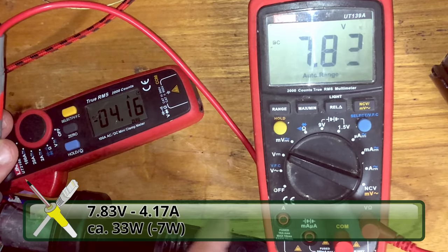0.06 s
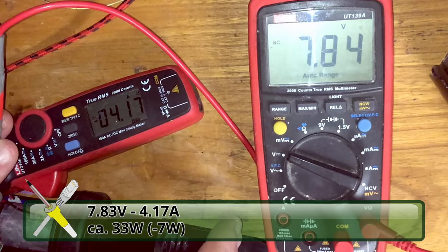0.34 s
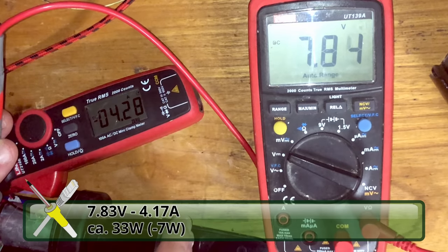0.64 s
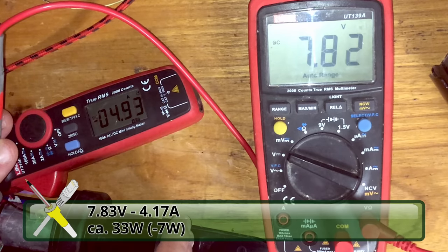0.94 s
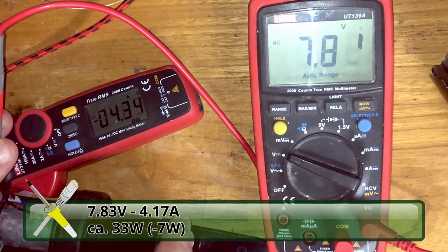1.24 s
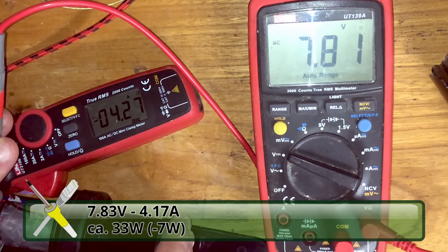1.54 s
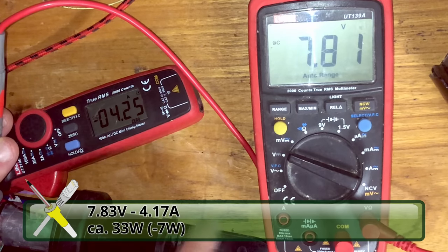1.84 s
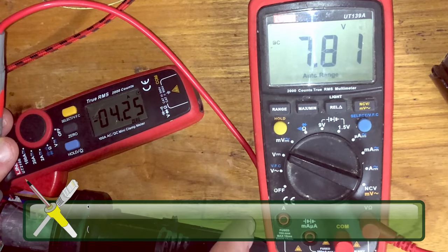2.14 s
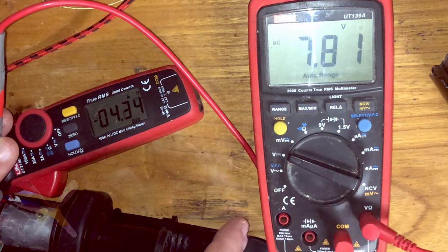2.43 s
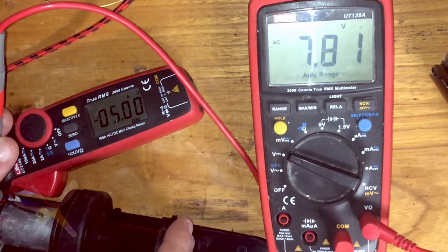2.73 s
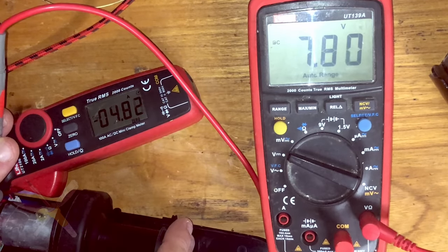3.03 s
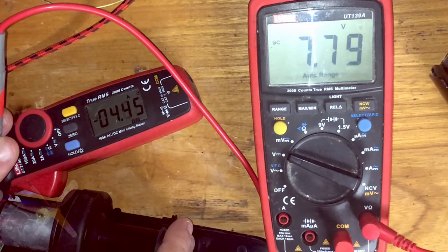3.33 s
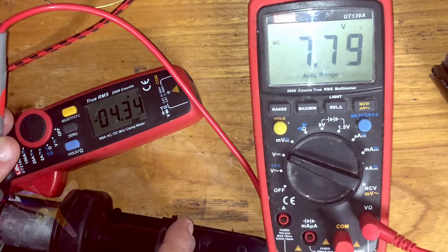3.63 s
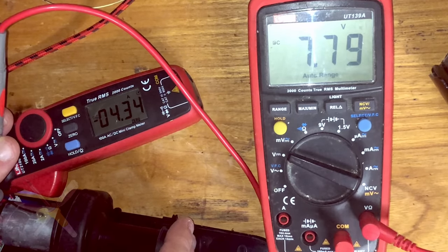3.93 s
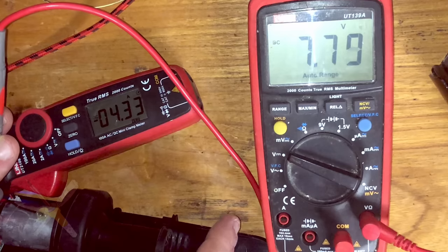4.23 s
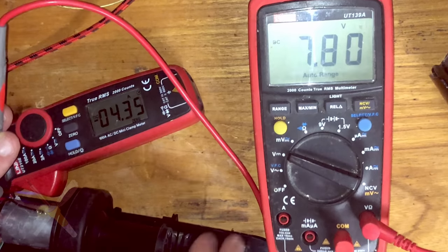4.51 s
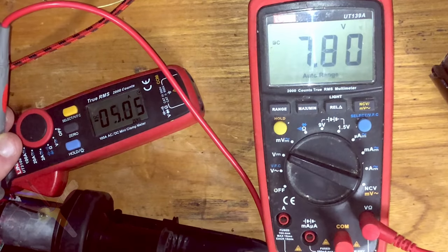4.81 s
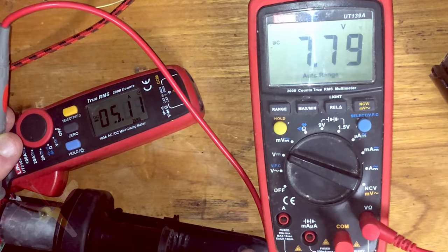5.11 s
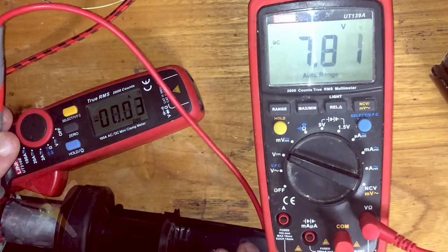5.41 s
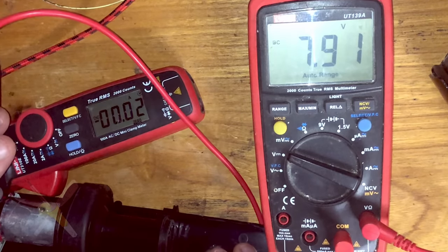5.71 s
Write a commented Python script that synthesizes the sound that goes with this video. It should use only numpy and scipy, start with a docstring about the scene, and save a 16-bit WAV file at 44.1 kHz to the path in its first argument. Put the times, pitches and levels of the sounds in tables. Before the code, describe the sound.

A small cordless vacuum whines over rushing air, rising in pitch twice as its nozzle is covered, then switches off and spins down.

```python
"""Handheld vacuum on a workbench

A cordless vacuum runs close by: its seven-blade fan whines over rushing air and a faint rumble.
Twice the nozzle is covered. With less air to move, the fan speeds up and burbles, and each release
lets in a gulp of air. Then the power is cut and the rotor coasts down with a dry rattle."""
import sys
import numpy as np
from scipy import signal
from scipy.fft import rfft, irfft
from scipy.io import wavfile

SR = 44100
rng = np.random.default_rng(int(sys.argv[2]) if len(sys.argv) > 2 else 0)


def inscribe(sig):
    """Save sig as 16-bit PCM at rate SR to the path in sys.argv[1].

    A 1-D sig is mono; a 2-D sig holds one channel per row.
    Samples are clipped to [-1, 1] before scaling.
    """
    pcm = np.round(np.clip(np.atleast_2d(sig).T, -1, 1) * 32767)
    wavfile.write(sys.argv[1], SR, pcm.astype(np.int16))


N = 254016

POWER_OFF_S, BLADES = 4.92, 7
START_HZ, OPEN_HZ, COVERED_HZ = 590, 541.8, 594.3  # shaft turns a second: at first, nozzle open, covered

# When the nozzle is covered: (start [s], end [s])
COVERINGS = [(0.573, 1.807), (2.622, 3.974)]
# The hum holds its first level, then sags shortly before the power is cut: (time [s], level change [dB])
HUM_SAG = [(4.41, 1.5), (4.47, -8.5), (4.6, 1.5), (4.65, -6.5)]
# Brief dips in the hum and the air: (start [s], end [s], level change [dB])
LULLS = [(0.574, 0.587, -12), (2.625, 2.64, -6), (4.175, 4.205, -1)]
# The blade whine with the nozzle open: (shaft speed [turns/s], level [dB])
WHINE_OPEN = [(220, -73), (462, -78), (478, -67), (505, -60), (542, -54.5), (548, -55), (554, -52),
              (575, -45), (590, -41.5)]
# The blade whine with the nozzle covered: (shaft speed [turns/s], level [dB])
WHINE_COVERED = [(545, -60.5), (563, -64), (574, -51), (578, -55.5), (586, -50), (591, -50)]
# Pitches where the whine gets quieter: (frequency [Hz], width [Hz], level change [dB])
WHINE_DIPS = [(3640, 110, -14), (3853, 14, -7), (3887, 12, -5), (3932, 22, -11)]
# The rotor's other tones; the two that are not whole come from ball bearings: (pitch [x shaft speed])
TONE_MULTIPLES = [2.131, 3.131, 5, 6, 8, 10, 14, 15, 20, 21, 25, 30, 35]
# Base level of each of those tones: (nozzle open [dB], covered [dB], coasting at 420 turns/s [dB])
TONE_LEVELS = [(-83, -83, -84), (-92, -79, -92), (-72.5, -71, -79), (-99, -86, -87), (-82, -79, -98),
               (-71, -68, -80), (-74, -78, -74), (-74, -71, -81), (-80, -84, -84), (-84, -74, -86),
               (-86.5, -88, -97), (-92, -92, -90), (-95, -95, -96)]
# Pitches at which the shell rings: (frequency [Hz], width [Hz], boost under power [dB])
SHELL_RESONANCES = [(1050, 150, 7), (1250, 70, 6), (1835, 120, 6), (2720, 400, 4), (4750, 300, 5),
                    (5520, 300, 7), (5920, 110, 6), (6500, 350, 5), (7900, 250, 8), (8250, 260, 10),
                    (8830, 190, 5), (12110, 470, 16), (13600, 700, 17), (14500, 450, 9), (15500, 500, 8)]
# Tone colour of the rushing air: (frequency [Hz], relative level [dB])
AIR_COLOUR = [(100, -52), (420, -29), (700, -18.5), (1300, -17), (2400, -16.5), (3500, -11), (4400, -2),
              (6400, -2.5), (7200, -5), (8450, -5.5), (8850, -12.5), (13200, -11), (14100, -19),
              (15700, -21.5)]
# Pitches at which the air ducts ring: (frequency [Hz], width [Hz], boost open [dB], boost covered [dB])
DUCT_RESONANCES = [(1003, 18, 9.5, -10), (1425, 150, 7, 12.5), (1904, 450, 8.5, 10), (2620, 330, 1, 6.5),
                   (2800, 82, -2.5, 1), (3400, 560, 1.5, 5.5), (4320, 54, 3, 6.5), (4650, 140, 0.5, 1.5),
                   (5020, 90, 4.5, 2.5), (5380, 210, 4.5, 1), (5680, 180, 3.5, 1), (6520, 230, 2, 4),
                   (7940, 710, 6.5, 2), (8760, 210, 5, -2), (9500, 340, 3.5, 1), (10550, 350, -1.5, -2.5),
                   (11200, 680, 2.5, 2), (12120, 990, 3.5, 3.5)]
# How the air's colour changes once the fan is slow: (frequency [Hz], level change [dB])
SLOW_AIR_CHANGE = [(300, 8), (1500, 9.5), (2800, 10.5), (3600, 5), (4500, 1), (6400, 1), (7650, 5),
                   (8050, 0), (9000, 3.5), (11000, -3), (12100, -7), (13200, 4), (14500, 5)]
# The gulp of air after each release, and smaller gusts: (start [s], end [s], boost [dB])
SURGES = [(0.0, 0.185, 2.5), (0.39, 0.455, 0), (1.8, 2.02, 3.5), (3.97, 4.168, 4), (4.965, 5.002, 2),
          (5.16, 5.26, 1)]
# Swells of the rumble: (start [s], end [s], deep part [dB], upper part [dB])
RUMBLE_SWELLS = [(0.13, 0.527, -86.5, -83.5), (1.518, 1.795, -103, -82), (2.6, 3.052, -87, -86.5),
                 (4.028, 4.334, -99, -87.5), (5.118, 5.148, -77, -77.5), (5.488, 5.76, -95, -76.5)]
# Tone colour of the rumble's deep part: (frequency [Hz], relative level [dB])
DEEP_RUMBLE_COLOUR = [(20, -22), (45, -17), (80, -1), (110, 4), (150, -1), (300, -34)]
# Tone colour of the rumble's upper part: (frequency [Hz], relative level [dB])
UPPER_RUMBLE_COLOUR = [(70, -36), (125, -7.5), (180, 0), (260, -6), (450, -13), (900, -54)]
# Tone colour of the fan when starved of air: (frequency [Hz], relative level [dB])
BURBLE_COLOUR = [(200, -50.5), (480, -28), (680, -12), (880, -9), (960, 0), (1035, 2), (1115, -6.5),
                 (1180, -13), (1275, -5), (1360, -16), (1480, -16.5), (1650, -24), (2400, -30), (4000, -48)]
# Tone colour of the rattle: (frequency [Hz], relative level [dB])
RATTLE_COLOUR = [(40, -50), (80, -20), (170, -9), (330, 3.5), (520, -0.5), (750, -6), (1100, -9.5),
                 (1450, 3), (1800, -1), (2300, -8.5), (5000, -15), (12000, -37)]

TIMES = np.arange(N) / SR
FREQUENCIES = np.fft.rfftfreq(N, 1 / SR)


def amp(db):
    """Turns decibels into a number to multiply a sound by."""
    return 10 ** (np.asarray(db) / 20)


def unit(x):
    """Scales a signal so that its typical size (rms) is 1."""
    return x / np.sqrt(np.mean(x ** 2) + 1e-20)


def curve(rows, at=TIMES):
    """Joins points with straight lines and reads them off, by default at every sample's time."""
    return np.interp(at, *np.transpose(rows))


def steps(rows):
    """Level changes that switch on and off, each edge taking 5 ms."""
    half_s = 0.0025
    return sum(curve([(on - half_s, 0), (on + half_s, db), (off - half_s, db), (off + half_s, 0)])
               for on, off, db in rows)


def colour(points):
    """Fills in a tone colour table, giving a level in dB for every frequency."""
    hz, db = np.transpose(points)
    return np.interp(np.log(FREQUENCIES + 1), np.log(hz), db)


def bumps(peaks, hz):
    """Adds up bell-shaped boosts and dips, in dB, at the frequencies hz."""
    return sum(db * np.exp(-np.log(2) * (2 * (hz - centre) / width) ** 2) for centre, width, db in peaks)


def noise(colour_db, band_hz):
    """Noise with the given colour, scaled so that the part inside band_hz has typical size 1."""
    spectrum = rfft(rng.standard_normal(N)) * amp(colour_db)
    inside = (FREQUENCIES > band_hz[0]) & (FREQUENCIES < band_hz[1])
    return irfft(spectrum, N) / np.std(irfft(spectrum * inside, N))


def waver(rate_hz):
    """A smooth random wobble of typical size 1, up to about rate_hz fast."""
    spectrum = rfft(rng.standard_normal(N)) * np.exp(-(FREQUENCIES / rate_hz) ** 2)
    return unit(irfft(spectrum, N))


def nozzle_cover(close_s=0.015, open_s=0.033):
    """How much of the nozzle is covered, from 0 (open) to 1 (sealed)."""
    return sum(curve([(on - close_s / 2, 0), (on + close_s / 2, 1),
                      (off - open_s / 4, 1), (off + open_s * 3 / 4, 0)]) for on, off in COVERINGS)


def shaft_speed(speed_up_s=0.345, slow_down_s=0.235, coast_s=0.899):
    """Turns a second: the rotor eases towards the speed its load allows, or towards rest without power."""
    changes = [(0, OPEN_HZ, slow_down_s)]
    for on, off in COVERINGS:
        changes += [(on, COVERED_HZ, speed_up_s), (off, OPEN_HZ, slow_down_s)]
    changes.append((POWER_OFF_S, 0, coast_s))
    speed = np.full(N, float(START_HZ))
    for start_s, goal_hz, lag_s in changes:
        at = round(start_s * SR)
        speed[at:] = goal_hz + (speed[at] - goal_hz) * np.exp(-TIMES[:N - at] / lag_s)
    return speed


def racing(speed):
    """0 at or below normal working speed, 1 when the fan spins fully unloaded."""
    return np.clip((speed - OPEN_HZ) / (COVERED_HZ - OPEN_HZ), 0, 1)


def octaves_down(speed):
    """How many times the speed has halved from its normal working value."""
    return np.maximum(np.log2(OPEN_HZ / speed), 0)


def shaft_tone(turns, multiple, level_db, flutter_db):
    """A tone at a multiple of the shaft speed; swirling air shakes its level and phase."""
    gain = amp(level_db + flutter_db * waver(rate_hz=29))
    phase = 2 * np.pi * (multiple * turns + rng.random()) + 0.07 * waver(rate_hz=90)
    return np.sqrt(2) * gain * np.sin(phase)


def hum(turns, speed, cover, coast):
    """The off-balance rotor hums, louder when racing; coasting, the hum is faint but grows as it slows."""
    powered_db = -65.7 + 7 * racing(speed) - 2.5 * cover + curve(HUM_SAG) + steps(LULLS)
    coasting_db = -87 + 10 * octaves_down(speed) + 4.9 * waver(rate_hz=17)
    level_db = powered_db + coast * (coasting_db - powered_db)
    return shaft_tone(turns, 1, level_db, flutter_db=0.84)


def whine(turns, speed, cover):
    """The passing blades whine, louder at speed and weaker when the fan is starved of air."""
    open_db, covered_db = curve(WHINE_OPEN, at=speed), curve(WHINE_COVERED, at=speed)
    level_db = open_db + cover * (covered_db - open_db)
    level_db += bumps(WHINE_DIPS, BLADES * speed) + 1.1 * waver(rate_hz=7.8)
    return shaft_tone(turns, BLADES, level_db, flutter_db=1.18)


def rotor_tones(turns, speed, cover, coast):
    """Blades, motor poles and bearings add tones that swell as they glide through the shell's resonances."""
    tones = np.zeros(N)
    wobble_db = 1.5 + 0.5 * coast
    for multiple, (open_db, covered_db, coast_db) in zip(TONE_MULTIPLES, TONE_LEVELS):
        powered_db = open_db + cover * (covered_db - open_db)
        coasting_db = coast_db + 4.5 * np.log2(speed / 420)
        base_db = (1 - coast) * powered_db + coast * coasting_db
        shell_db = bumps(SHELL_RESONANCES, multiple * speed) * (1 + 0.6 * coast)
        level_db = base_db + shell_db + wobble_db * waver(rate_hz=7)
        tones += shaft_tone(turns, multiple, level_db, flutter_db=0.9)
    return tones


def air_level(speed, cover, open_db=-54, covered_db=-58.5):
    """The airflow's level in dB: it follows the speed, drops under the cover and gulps on release."""
    free_db = open_db + steps(SURGES)
    nozzle_db = free_db + cover * (covered_db - free_db)
    speed_db = 3 * racing(speed) - 12.5 * octaves_down(speed)
    flicker_db = 0.5 * waver(rate_hz=9.8) + 0.7 * waver(rate_hz=64)
    return nozzle_db + speed_db + steps(LULLS) + flicker_db


def rushing_air(speed, cover):
    """Air swirls through the ducts; covering the nozzle changes their ring, and a slow fan sounds duller."""
    open_peaks = [(hz, width, db) for hz, width, db, _ in DUCT_RESONANCES]
    covered_peaks = [(hz, width, db) for hz, width, _, db in DUCT_RESONANCES]
    open_db = colour(AIR_COLOUR) + bumps(open_peaks, FREQUENCIES)
    covered_db = colour(AIR_COLOUR) + bumps(covered_peaks, FREQUENCIES)
    slow_db = open_db + colour(SLOW_AIR_CHANGE)
    free, choked, slow = (noise(db, band_hz=(4500, 8600)) for db in (open_db, covered_db, slow_db))
    slowness = np.clip((520 - speed) / 250, 0, 1) ** 2
    # square roots keep the loudness even while one noise fades into another
    running = np.sqrt(1 - cover) * free + np.sqrt(cover) * choked
    rush = np.sqrt(1 - slowness) * running + np.sqrt(slowness) * slow
    return amp(air_level(speed, cover)) * rush


def rumble(rise_db_per_s=127, fall_db_per_s=70):
    """A faint rumble comes and goes, sometimes deeper, sometimes lighter."""
    deep_gain, upper_gain = amp(-111), amp(-106)  # between the swells
    for start, end, deep_db, upper_db in RUMBLE_SWELLS:
        fade_db = rise_db_per_s * np.maximum(start - TIMES, 0) + fall_db_per_s * np.maximum(TIMES - end, 0)
        deep_gain = np.hypot(deep_gain, amp(deep_db - fade_db))
        upper_gain = np.hypot(upper_gain, amp(upper_db - fade_db))
    deep = noise(colour(DEEP_RUMBLE_COLOUR), band_hz=(45, 125))
    upper = noise(colour(UPPER_RUMBLE_COLOUR), band_hz=(125, 280))
    return deep_gain * deep + upper_gain * upper


def burble(speed, cover, linger_s=0.005):
    """Starved of air, the blades stall (lose their grip on it) in uneven puffs that ring the fan chamber."""
    decay = np.exp(-1 / (linger_s * SR))
    lingering = signal.lfilter([1 - decay], [1, -decay], cover)
    stalled = np.maximum(cover, lingering)
    puffs = unit(amp(0.8 * waver(rate_hz=69)))
    level_db = -59 + 4 * racing(speed) + 0.8 * waver(rate_hz=3.3)
    return stalled * amp(level_db) * puffs * noise(colour(BURBLE_COLOUR), band_hz=(720, 1450))


def rattle(speed, starts_below_hz=347):
    """The slowing rotor chatters in its bearings once a turn and shakes the shell."""
    looseness = np.clip((starts_below_hz - speed) / 70, 0, 1)
    turns = np.cumsum(speed) / SR
    chatter = unit(1 + 0.12 * np.cos(2 * np.pi * turns))
    level_db = -68 + 1.5 * np.log2(starts_below_hz / speed)
    return looseness * amp(level_db) * chatter * noise(colour(RATTLE_COLOUR), band_hz=(900, 2100))


def scene():
    """Adds up the vacuum's sounds, the same on the left and the right."""
    speed, cover = shaft_speed(), nozzle_cover()
    coast = curve([(POWER_OFF_S, 0), (POWER_OFF_S + 0.05, 1)])  # 0 under power, 1 coasting
    turns = np.cumsum(speed * (1 + 0.0003 * waver(rate_hz=50))) / SR  # turns so far, slightly uneven
    vacuum = hum(turns, speed, cover, coast) + whine(turns, speed, cover)
    vacuum += rotor_tones(turns, speed, cover, coast)
    vacuum += rushing_air(speed, cover) + rumble() + burble(speed, cover) + rattle(speed)
    return np.array([vacuum, vacuum])


def record(dry):
    """Cuts away the very highest treble."""
    low_pass = signal.firwin(511, cutoff=15760, window=("kaiser", 9), fs=SR)
    return signal.oaconvolve(dry, low_pass[None], "same", axes=1)


dry = scene()
out = record(dry)
inscribe(out)
```